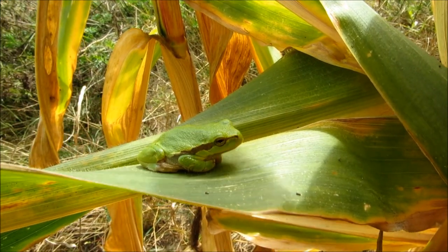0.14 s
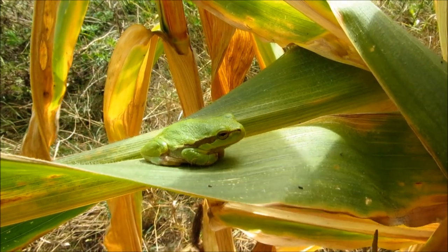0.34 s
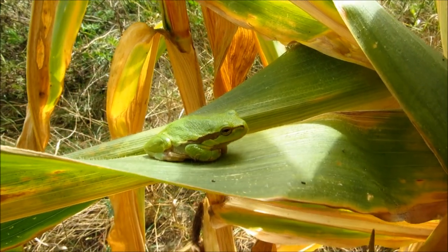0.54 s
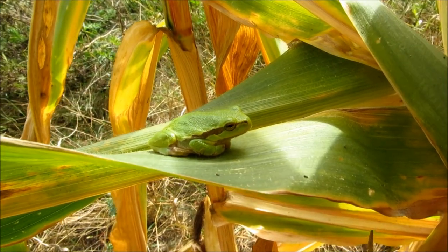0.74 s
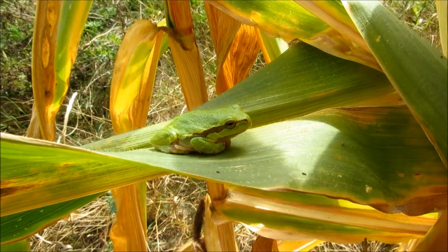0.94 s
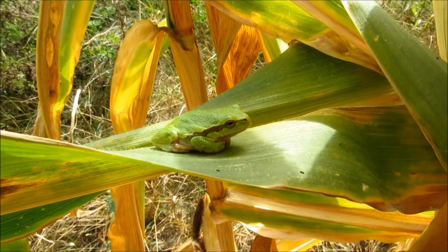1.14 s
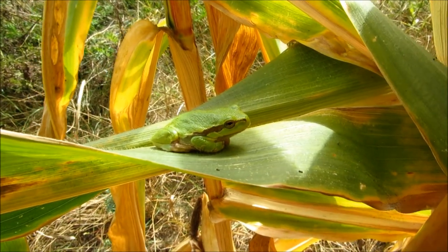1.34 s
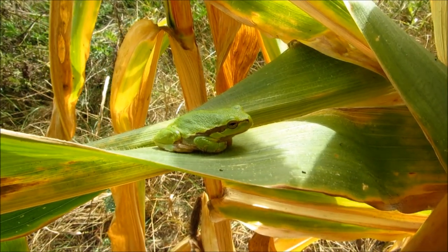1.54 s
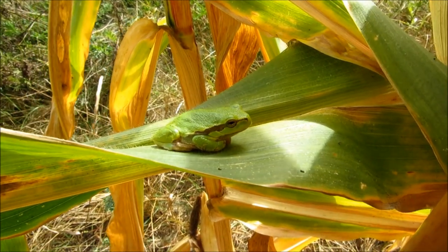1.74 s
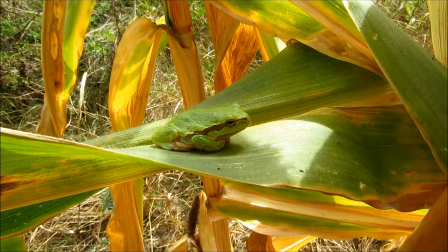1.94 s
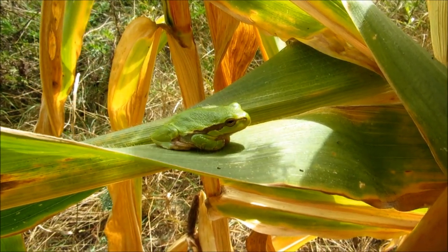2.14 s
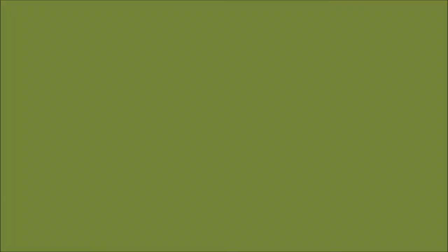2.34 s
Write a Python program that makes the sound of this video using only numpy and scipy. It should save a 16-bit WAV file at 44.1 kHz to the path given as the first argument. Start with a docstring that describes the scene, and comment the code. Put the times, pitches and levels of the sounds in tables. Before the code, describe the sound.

Dry maize leaves rustle and crackle close by in wind, with small stalk taps and soft thumps

```python
"""Dry leaves crackle, scrape and tap their stalks over a wide hiss and low thumps; a quick fade ends it.
Wind moves through a field of dry maize around a small stereo microphone that widens its picture.
Near leaves are random clicks through leaf colour or blade resonance, pitched ticks at random instants,
and stalk knocks of damped sines with a tick of clicks on top; far leaves are shaped noise.
Gusts are low noise that thumps the two microphone ports in opposite directions."""
import sys
import numpy as np
from scipy import signal
from scipy.io import wavfile
from scipy.ndimage import uniform_filter1d

SR = 44100
rng = np.random.default_rng(int(sys.argv[2]) if len(sys.argv) > 2 else 0)


def int16_out(signal):
    """Quantize to a 16-bit WAV file."""
    q = np.round(np.clip(np.atleast_2d(signal).T, -1, 1) * 32767)
    wavfile.write(sys.argv[1], SR, q.astype(np.int16))


def attenuation_scalar(level_db):
    """Turn a level in dB into a linear amplitude multiplier (20 dB per decade)."""
    decades = np.asarray(level_db, float) / 20
    return 10 ** decades


N = 105840  # samples

# colour of a dry leaf edge: f/Hz, relative density/dB per Hz
LEAF = [(110, -38.5), (250, -10.5), (610, -12.5), (1070, -5.5), (3660, -4.5), (8280, -10.5), (14600, -21),
        (15800, -31.5)]


def evened(x):
    """Scales to unit rms."""
    return x / np.sqrt(np.mean(x ** 2) + 1e-20)


def peaked(shape):
    """Scales to unit peak."""
    return shape / (abs(shape).max() + 1e-12)


def read(points, hz):
    """Reads a spectrum table on a log-frequency axis."""
    f, value = np.transpose(points)
    return np.interp(np.log(hz + 1), np.log(f + 1), value)


def curve(points):
    """Interpolates a (t/s, value) table at every sample."""
    t, value = np.transpose(points)
    return np.interp(np.arange(N) / SR, t, value)


def sides(mid, side):
    """Left and right from middle and side."""
    return np.array([mid + side, mid - side])


def add(mix, start_s, sound):
    """Mixes a sound in at start_s, in place."""
    part = mix[max(round(start_s * SR), 0):][:len(sound)]
    part += sound[:len(part)]


def tilted(x, bright_db):
    """Raises or lowers the treble above 5 kHz."""
    low = signal.lfilter(*signal.butter(2, 5000, fs=SR), x)
    return low + attenuation_scalar(bright_db) * (x - low)


def causal(points):
    """Minimum-phase impulse response with the colour of a table: all energy follows the click."""
    level_db = np.maximum(read(points, abs(np.fft.fftfreq(2048, 1 / SR))), -70)
    log_gain = level_db * np.log(10) / 20
    return np.fft.ifft(np.exp(np.conj(signal.hilbert(log_gain)))).real[:1024]


def clicks(per_s, spread_db, size):
    """Random clicks of either sign; exponentially spread dB levels make a few large."""
    chance, big, sign = rng.random((size, 3)).T
    size_db = spread_db * np.minimum(-np.log(big + 1e-9), 4)
    return (chance < per_s / SR) * attenuation_scalar(size_db) * np.sign(sign - .5)


def burst(per_s, time_s):
    """A patter of clicks that rises fast and dies away."""
    u = np.arange(1400) / SR / time_s
    return clicks(per_s, 1.5, size=1400) * np.sqrt(u) * np.exp(-u)


def leaf_colour(hits):
    """Clicks take the broad colour of a dry leaf edge."""
    return np.convolve(hits, causal(LEAF))[:len(hits)]


def blade(hits, hz, damping, broad_db):
    """Clicks excite one broad, damped blade resonance, with the leaf's own colour added."""
    t = np.arange(400) / SR
    ring = t * np.exp(-2 * np.pi * damping * hz * t) * np.sin(2 * np.pi * hz * t)
    resonant = np.convolve(hits, ring - ring.mean())[:len(hits)]
    broad = tilted(leaf_colour(hits), 4.5)
    return evened(evened(resonant) + attenuation_scalar(broad_db) * evened(broad))


def snap(peak_db, hz, broad_db):
    """A dry blade snaps: a short dense crack of clicks through its resonance."""
    hits = burst(per_s=9900, time_s=.0013)
    return attenuation_scalar(peak_db) * peaked(blade(hits, hz, .34, broad_db))


def scrape(length_s, level_db, hz, broad_db):
    """Blade rubs on blade: dense clicks swell and fade under one stroke."""
    stroke = np.sin(np.pi * np.clip(np.arange(4000) / SR / length_s, 0, 1)) ** 2
    hits = clicks(9000, 3.0, size=4000)
    return attenuation_scalar(level_db) * stroke * blade(hits, hz, .66, broad_db)


def tap(peak_db, ring_s, hz, dark_db):
    """A leaf edge knocks a stalk: a few damped sines as modes, with a tick of leaf clicks on top."""
    # stalk modes: multiple of the pitch, level/dB before darkening
    stalk = [(.36, -8.5), (.68, -5), (1, 0.5), (1.24, -5.5), (1.9, -6.5)]
    tick_db, bounces_per_s = -6.5, 3400
    bounce_s = .067 * ring_s
    t = np.arange(1400) / SR
    ring = np.zeros(len(t))
    for k, db in stalk:
        mode_db = db - dark_db * np.log2(k) - 60 * t / ring_s
        ring += attenuation_scalar(mode_db) * np.sin(2 * np.pi * k * hz * t)
    ring *= 1 - np.exp(-t / bounce_s)  # soft onset
    tick = leaf_colour(burst(bounces_per_s, bounce_s))
    return attenuation_scalar(peak_db) * (peaked(ring) + attenuation_scalar(tick_db) * peaked(tick))


def near_leaves():
    """Taps, snaps and scrapes sit a little right and reach the ports by slightly different paths."""
    # taps of leaf on stalk: start t/s, ring peak/dB, ring t60/s, pitch f/Hz, darkness/dB per octave
    taps = [(.3305, -28.5, 0.021, 1127, -3), (0.338, -31, 0.041, 1040, -6), (0.3512, -23, .018, 1083, -2),
            (.5037, -23, 0.027, 1087, -2), (.5762, -32, 0.016, 1090, -6), (0.7216, -31, 0.016, 1234, -0.5),
            (0.7617, -35, .01, 1190, -2), (.7985, -30, 0.0195, 1098, -4), (0.818, -36, 0.035, 1250, 0.5),
            (1.323, -36, 0.0096, 1460, 2), (1.3429, -35.5, 0.011, 1080, 1.5), (1.799, -30, .005, 950, -3.5)]
    # snaps of a dry blade: start t/s, peak/dB, centre f/Hz, broad part/dB re resonance
    snaps = [(.035, -33, 2680, -2), (0.069, -33, 4000, 0), (0.109, -33, 3500, -6), (.147, -30.5, 2950, -13),
             (.4655, -25, 4800, 2), (0.552, -25.5, 3180, 1.5), (.8245, -31, 2800, 2),
             (1.024, -30, 2840, 1.5), (1.043, -30.5, 2840, -6), (1.0746, -13, 3780, 8),
             (1.1065, -28, 2500, 1), (1.177, -30, 2900, 2), (1.323, -30.5, 3300, -7), (1.38, -36, 4000, 0),
             (1.516, -28, 8500, 3)]
    # scrapes of blade on blade: middle t/s, length/s, rms before stroke/dB, centre f/Hz, broad part/dB
    scrapes = [(0.278, 0.048, -44.5, 5450, -0.5), (0.619, .02, -42.5, 4530, -3),
               (.9, 0.054, -37.5, 3520, 2.5), (1.073, 0.017, -27, 5630, 10),
               (1.086, 0.032, -35.5, 2740, 3.5), (1.186, 0.033, -36.5, 3500, 9),
               (1.417, 0.024, -42.5, 2620, 0), (2.011, 0.039, -46, 2770, -2)]
    near = np.zeros(N)
    for start_s, *row in taps:
        add(near, start_s, tap(*row))
    for start_s, *row in snaps:
        add(near, start_s, snap(*row))
    for middle_s, length_s, *row in scrapes:
        add(near, middle_s - length_s / 2, scrape(length_s, *row))
    port_hz, side_gain = 3000, .18
    path_difference = np.roll(near, shift=9) - np.roll(near, shift=23)  # delays in samples
    apart = signal.lfilter(*signal.butter(1, port_hz, "high", fs=SR), path_difference)
    balance_db = np.array([[-.5], [.5]])  # left, right
    return sides(near, side_gain * apart) * attenuation_scalar(balance_db)


def grains():
    """Tiny decaying ticks at 12 pitches, each pitch with its own sparse clicks."""
    per_s, spread_db, cycles = 8000, 3, 4.65  # rate of all pitches together; cycles per unit of u
    out, pitches_hz = np.zeros(N), np.geomspace(602.7, 10910, num=12)
    for hz in pitches_hz:
        u = np.arange(800) / SR * hz / cycles
        tick = u * np.exp(-4 * u) * np.sin(2 * np.pi * cycles * u)
        tick *= hz ** .68 * attenuation_scalar(read(LEAF, hz))
        hits = clicks(per_s / len(pitches_hz), spread_db, size=N)
        out += signal.oaconvolve(hits, tick)[:N]
    return evened(out)


def rustle():
    """A clumpy stream of leaf ticks whose strength drifts."""
    # near rustle: t/s, level before clumping/dB
    drift = [(0, -58.5), (.06, -49), (.2, -55), (.3, -48), (.4, -59.5), (.53, -48.5), (.68, -52),
             (.82, -46.5), (.93, -46.5), (.97, -58), (1.05, -46.5), (1.15, -46.5), (1.23, -57.5),
             (1.45, -55), (2.1, -56.5)]
    clump_db, side_gain = 1.28, .4
    clumps = evened(uniform_filter1d(uniform_filter1d(rng.standard_normal(N), size=500), size=500))
    level = attenuation_scalar(curve(drift) + clump_db * clumps)
    return sides(level * grains(), side_gain * level * grains())


def noise(points, patchy_db, flicker_db, size):
    """Random short-time spectra with small patches and a flicker shared by all bands."""
    hop = size // 4
    frames, hz = N // hop + 5, np.fft.rfftfreq(size, 1 / SR)
    a, b, patches = rng.standard_normal((frames, len(hz), 3)).T
    patches = evened(uniform_filter1d(uniform_filter1d(patches, size=8, axis=0), size=12, axis=1))
    flicker = evened(uniform_filter1d(rng.standard_normal(frames), size=6))
    level_db = read(points, hz)[:, None] + patchy_db * patches + flicker_db * flicker
    z = (a + 1j * b) * attenuation_scalar(level_db)
    return evened(signal.istft(z, nperseg=size, noverlap=size - hop)[1][:N])


def gusts():
    """Low lumpy pressure pushes one port and pulls the other."""
    # gust strength: t/s, side level/dB
    strength = [(0, -46.5), (.05, -30), (.1, -50), (.24, -40), (.3, -43.5), (.4, -34), (.5, -39),
                (.58, -43), (.8, -52), (1.0, -59.5), (2.0, -56.5)]
    # gust colour: f/Hz, relative density/dB per Hz
    colour = [(12, -26), (20, 0), (46, 3), (179, -29), (500, -70.5)]
    level = attenuation_scalar(curve(strength))
    push = level * noise(colour, 0, 0, size=4096)
    own = level * noise(colour, 0, 0, size=4096)
    return sides(.1 * push + .15 * own, push)  # middle: leaked push, unrelated part


def hiss():
    """The far field of leaves blurs into wide noise with a drifting treble."""
    # colour shared by both sides: f/Hz, relative density/dB per Hz
    mid_colour = [(30, 0), (59, -2), (108, -6), (400, -5), (1490, -4), (3440, -6), (10600, -13),
                  (15800, -19)]
    # colour the sides oppose: f/Hz, relative density/dB per Hz
    side_colour = [(30, 0), (114, -6), (343, -0.5), (1180, -0.5), (4000, -11), (11800, -21.5),
                   (15800, -26.5)]
    # far treble: t/s, gain above 5 kHz/dB
    treble = [(0, -1.5), (.7, -2), (1.2, 0), (1.5, 4), (2.1, 3.5)]
    mid = attenuation_scalar(-52.5) * noise(mid_colour, patchy_db=1, flicker_db=2, size=512)
    side = attenuation_scalar(-47) * noise(side_colour, patchy_db=.5, flicker_db=1, size=512)
    return tilted(sides(mid, side), curve(treble))


def scene():
    """Sums near leaves, rustle, gusts and far hiss, in stereo."""
    return near_leaves() + rustle() + gusts() + hiss()


def low_pass(x):
    """Removes everything above the highest recorded frequency."""
    return signal.sosfilt(signal.butter(12, 15900, fs=SR, output="sos"), x)


def record(dry):
    """Applies the overall gain and the quick fade-out."""
    # overall gain, held before the first point: t/s, gain/dB
    fade = [(2.132, 2), (2.135, -2.5), (2.151, -32), (2.183, -30), (2.201, -51), (2.21, -100)]
    mix = dry * attenuation_scalar(curve(fade))
    return low_pass(mix)


dry = scene()
out = record(dry)
int16_out(out)
```